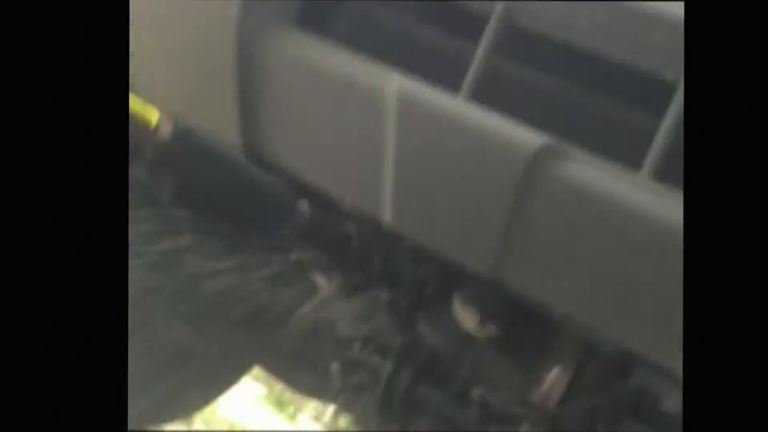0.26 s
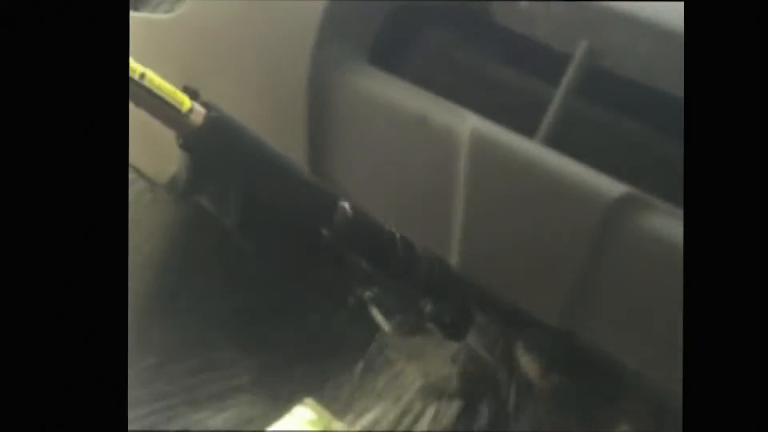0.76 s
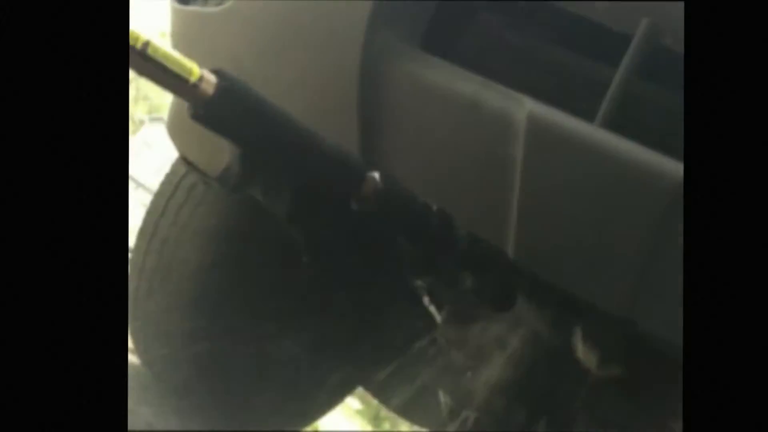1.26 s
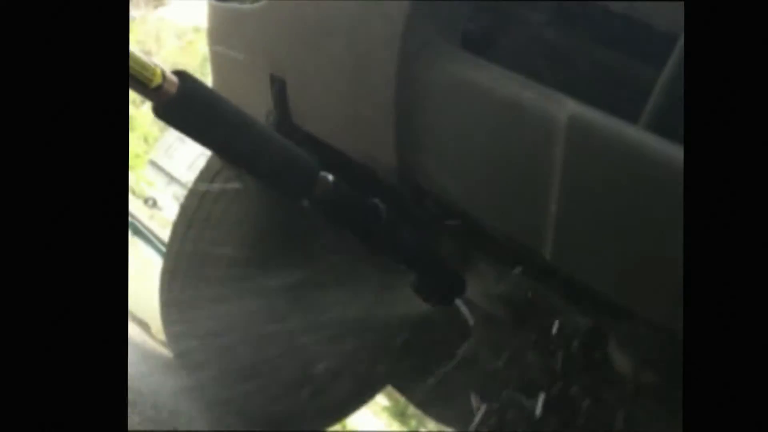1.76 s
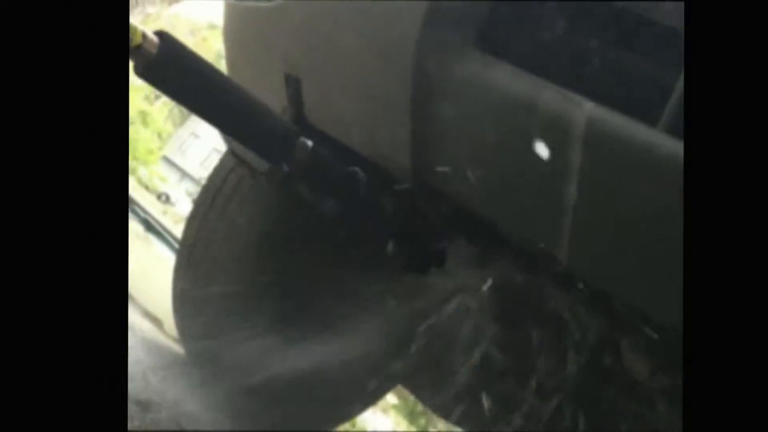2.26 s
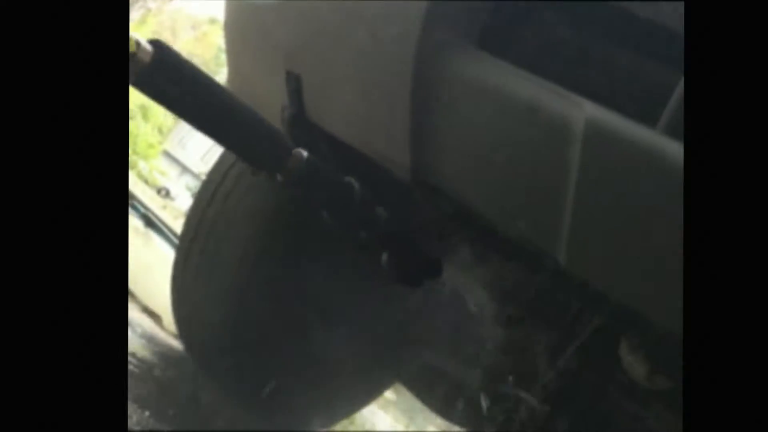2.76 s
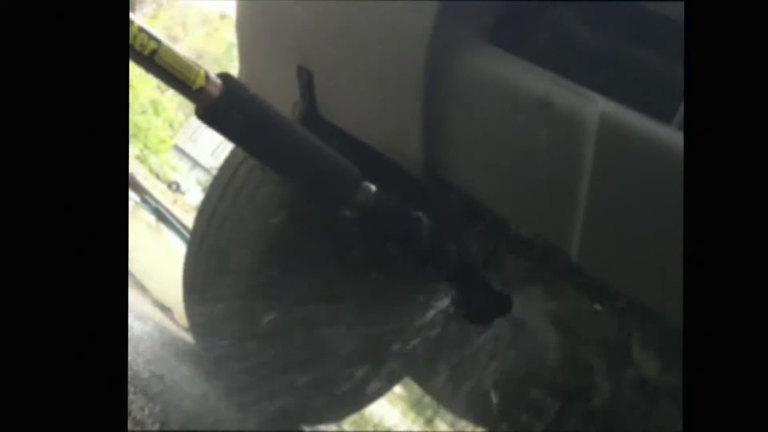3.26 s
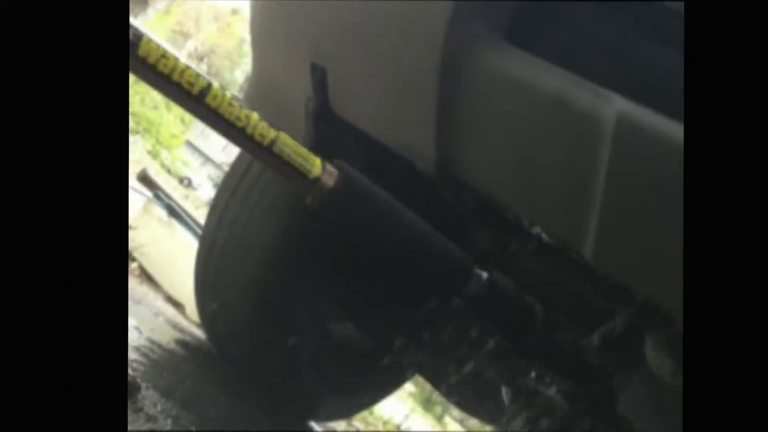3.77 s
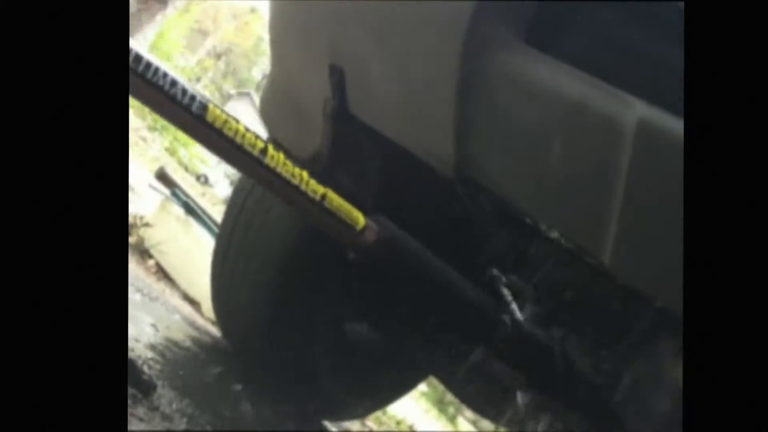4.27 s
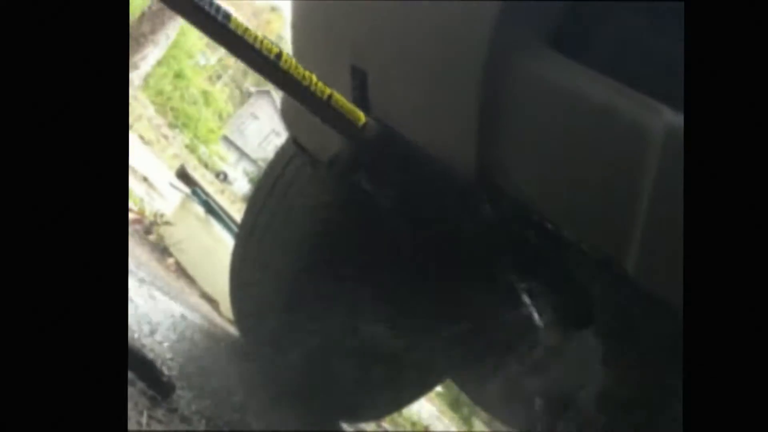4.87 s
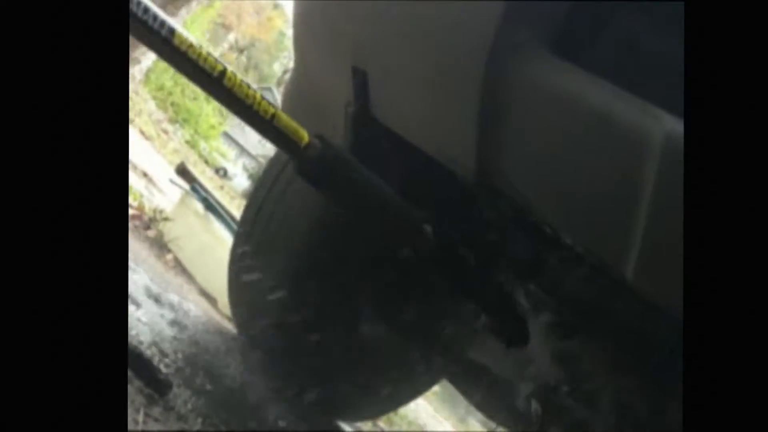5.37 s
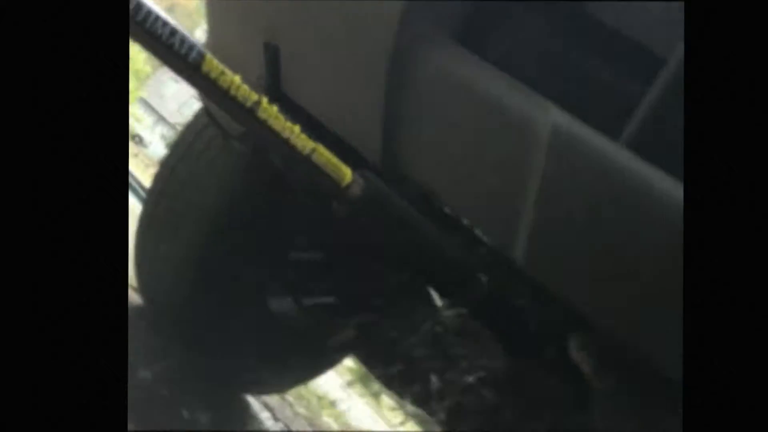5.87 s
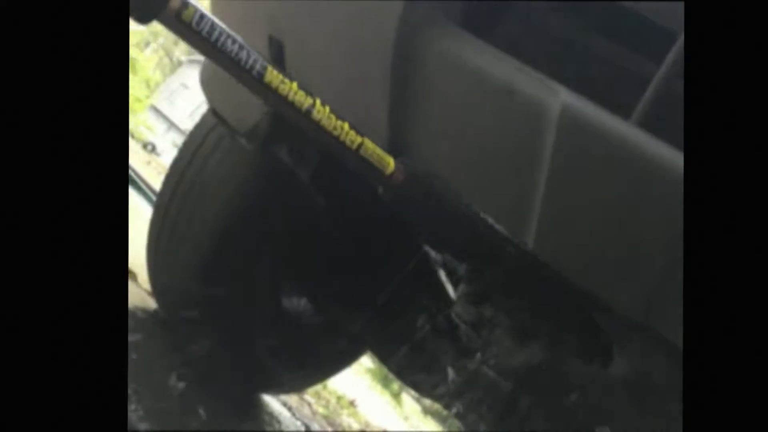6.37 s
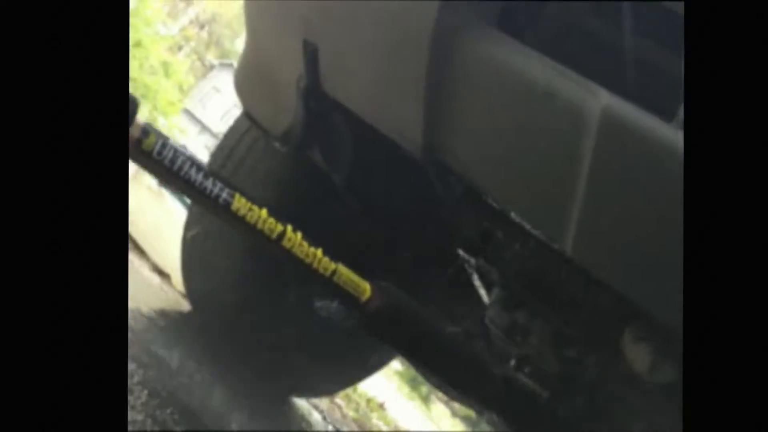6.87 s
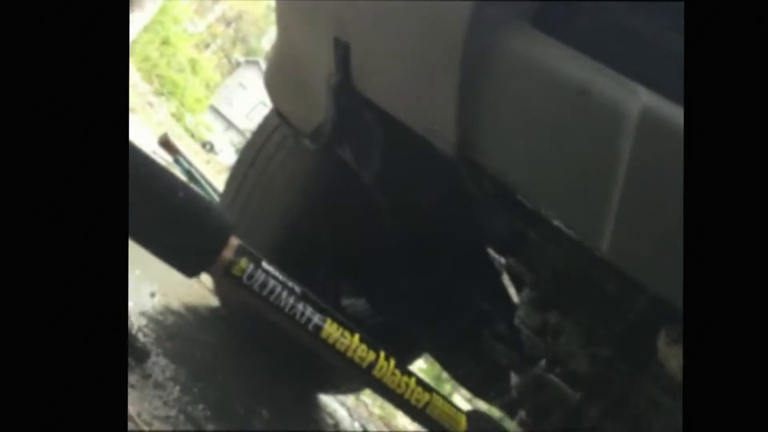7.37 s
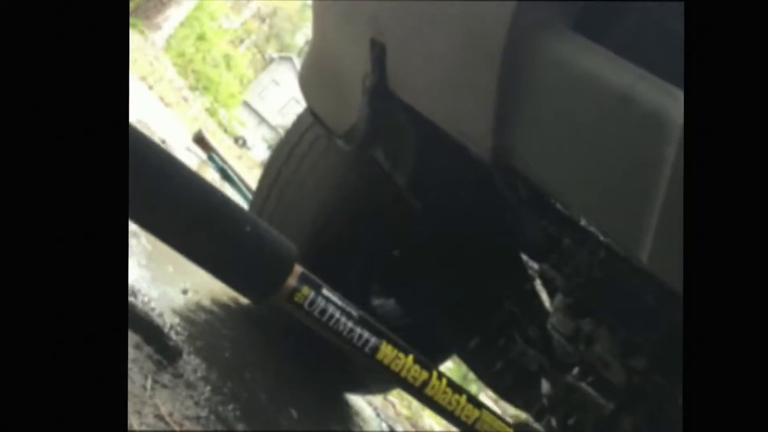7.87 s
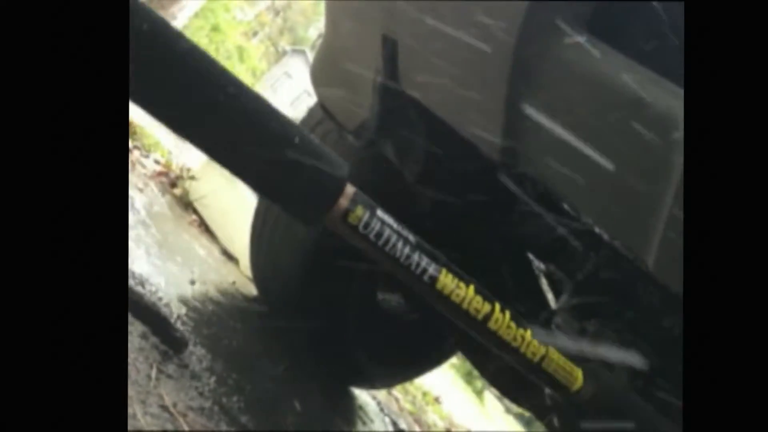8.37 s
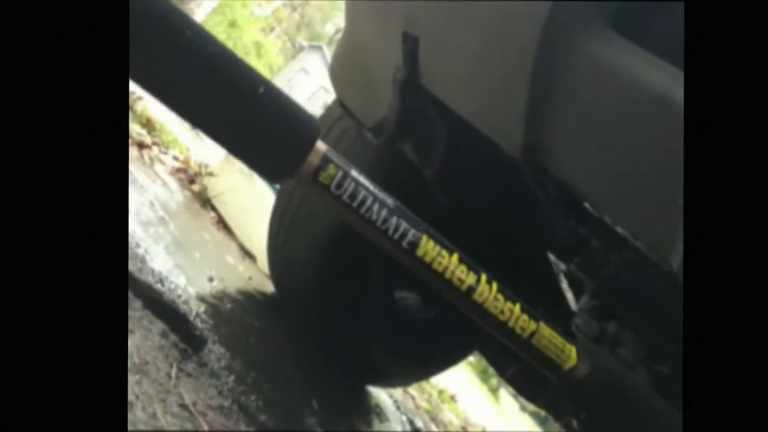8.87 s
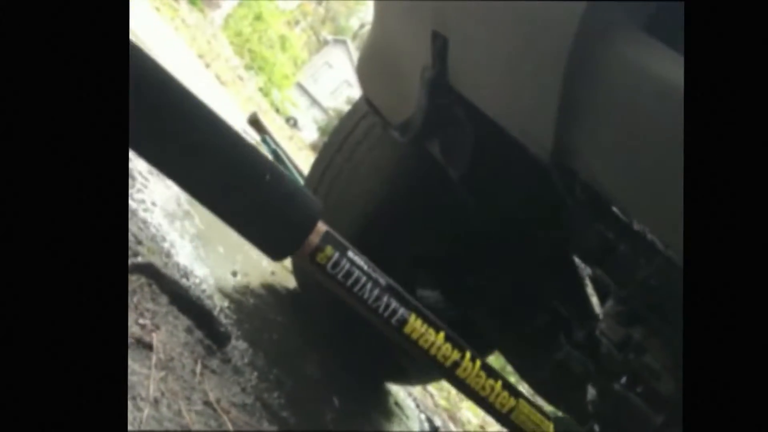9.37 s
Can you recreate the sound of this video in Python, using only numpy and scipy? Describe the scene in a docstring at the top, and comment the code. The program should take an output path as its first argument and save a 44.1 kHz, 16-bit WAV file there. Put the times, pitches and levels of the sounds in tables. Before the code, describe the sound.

A strong water jet sweeps across hard parts beneath a vehicle, heard from very near. It begins as nearly continuous rushing spray with brief dips, swells into harsh splashing, then comes in short uneven hits. Heavy slugs slap and ring dully, close echoes shift the colour, and light drips and ground wash fill the gaps above a soft outdoor rumble.

```python
"""Outdoors, close by: a hose wand sprays the underside of a car.
The jet breaks into slugs and drops: bursts of noise that drum on one part after another, each with
its own hollow ring. Echo paths between floor, tyre and ground open and close as the wand moves.
Heavy slugs slap hollow parts, panels thrum, stray spray patters all round over a low outdoor rumble."""
import sys
import numpy as np
from scipy import signal
from scipy.fft import rfft, irfft, next_fast_len
from scipy.io import wavfile
from scipy.ndimage import uniform_filter1d

SR = 44100
rng = np.random.default_rng(int(sys.argv[2]) if len(sys.argv) > 2 else 0)


def wrap_up_sound(samples):
    """Save the sound to the file named by the first command line argument, as 16-bit audio."""
    columns = np.atleast_2d(samples).T
    # keep every value between -1 and 1, then stretch to whole-number steps
    tamed = np.clip(columns, -1, 1)
    steps = np.round(tamed * 32767).astype(np.int16)
    wavfile.write(sys.argv[1], SR, steps)


N = 424241
TIME = np.arange(N) / SR  # seconds
PADDED = next_fast_len(N + SR // 10)
BINS_HZ = np.maximum(np.fft.rfftfreq(PADDED, 1 / SR), 1)


def from_db(db):
    """Decibels to gain."""
    return 10 ** (np.asarray(db) / 20)


def rms_one(x):
    """Scale to unit power."""
    return x / np.sqrt(np.mean(x ** 2) + 1e-20)


def over_time(table):
    """Join the points of a table (seconds, value) with straight lines."""
    return np.interp(TIME, *np.transpose(table))


def drift(rate):
    """Smooth random wandering of spread 1 that changes about `rate` times a second."""
    # computed at every 40th sample, then joined by straight lines
    r = np.exp(-80 * np.pi * rate / SR)
    noise = rng.standard_normal(N // 40 + 3002)
    slow = signal.lfilter([1], [1, -2 * r, r * r], noise)[3000:]  # skip the filter's start
    return np.interp(np.arange(N) / 40, np.arange(len(slow)), rms_one(slow))


def resonator(hz, width_hz):
    """Filter coefficients of one resonance with gain 1 on top."""
    r = np.exp(-np.pi * width_hz / SR)
    zeros = np.array([1, 0, -1]) * (1 - r * r) / 2
    poles = [1, -2 * r * np.cos(2 * np.pi * hz / SR), r * r]
    return zeros, poles


def resonate(x, hz, width_hz):
    """Ring one resonance with a sound."""
    return signal.lfilter(*resonator(hz, width_hz), x)


def slow_level(x, window_s):
    """Running rms: dividing by it evens out the slow level and keeps the fast grain."""
    size = int(window_s * SR / 2) + 1
    power = uniform_filter1d(uniform_filter1d(x * x, size), size)
    return np.sqrt(np.abs(power) + 1e-20)


def coloured(x, spectrum):
    """Give a sound the spectrum (Hz, dB), falling away below its lowest point, at unit power."""
    hz, db = np.transpose(spectrum)
    gain = from_db(np.interp(np.log(BINS_HZ), np.log(hz), db))
    gain = gain * np.minimum(BINS_HZ / hz[0], 1) ** 2
    return rms_one(irfft(rfft(x, PADDED) * gain, PADDED)[:N])


def drops(per_s, spread_db, splat_s):
    """Power of impacts at random moments, mean 1: many small, a few large, each dying away at once."""
    sizes = from_db(spread_db * np.minimum(rng.exponential(1, N), 4))
    hits = rng.random(N) < per_s / SR
    power = signal.lfilter([1], [1, -np.exp(-1 / (splat_s * SR))], sizes ** 2 * hits + 1e-12)
    return power / power.mean()


# How far the jet has broken up, from an even fan of mist to slugs and drops.
# Each row: time in seconds, share from 0 to 1.
BREAKUP = [(0, 0.34), (0.9, 0.47), (1.6, 0.56), (2.3, 0.63), (3.2, 0.66)]


def jet():
    """Power of the jet on the metal: fine drops in a smooth mist, and heavy slugs once it breaks up."""
    broken = over_time(BREAKUP)
    fine = 1 + from_db(5.0) * drops(per_s=1900, spread_db=7.0, splat_s=0.00077)
    slugs = drops(per_s=260, spread_db=3.0, splat_s=0.0041)
    return 1 + broken * (fine / fine.mean() - 1), 1 + broken * (slugs - 1), broken


def contact(t, start, end, speed):
    """Gain of one pass: it swells as the jet lands, holds, and fades as it slides off; fast is crisp."""
    land_db_per_s, leave_db_per_s = 338, 294  # at speed 1
    early_s, late_s = np.maximum(start - t, 0), np.maximum(t - end, 0)
    return from_db(-speed * (land_db_per_s * early_s + leave_db_per_s * late_s))


# Resonances of the parts under the jet; each is filtered twice, which narrows its ring.
# Each row: pitch in Hz, width of one filter in Hz, level in dB relative to the other rows.
SILL = [(770, 420, -4), (1054, 200, 1), (1403, 310, 2.5), (2240, 760, 1.5), (3030, 2100, -3),
        (4100, 3600, -1.5), (9100, 2600, -4.5), (12500, 22000, -5)]
SILL_LIP = [(796, 380, -4), (1106, 370, 0.5), (2200, 540, 1.5), (2520, 2700, 5), (4000, 810, 0),
            (6300, 2000, -2.5), (10500, 20000, -6)]
WHEEL_ARCH = [(775, 250, -7.5), (1480, 200, -1), (2230, 1860, 7), (3760, 1000, 1.5), (5870, 1660, 7),
              (9130, 1200, 5.5), (11840, 730, 3.5), (14400, 2000, -7)]
FLOOR_PAN = [(770, 440, -19), (1830, 910, 10), (2830, 320, 2.5), (3360, 300, 6), (5240, 940, -2.5),
             (8500, 3100, -9), (11400, 1200, -10.5)]
CHASSIS = [(790, 370, -10), (1350, 680, 0), (1940, 1100, 6.5), (2870, 640, 4.5), (3900, 1700, 0),
           (5540, 1800, 1.5), (8400, 2000, -6.5), (11900, 6000, -12.5)]
FRAME_RAIL = [(1080, 130, -0.5), (1570, 410, 1.5), (2250, 290, 6), (2930, 450, -3), (3680, 580, -4.5),
              (4850, 990, -3.5), (8000, 1400, -11)]
BRACKET = [(1970, 230, -6), (2680, 560, 6), (4500, 280, 1), (5640, 750, 10), (9000, 950, -4.5),
           (11750, 920, -15)]
PIPE = [(1190, 180, -2.5), (2170, 480, 2.5), (2810, 350, 5), (4170, 960, 2), (6100, 600, -9),
        (8420, 610, -4)]
SHIELD = [(715, 620, -7.5), (1270, 330, 0.5), (1596, 370, 10.5), (3080, 2600, 0.5), (6450, 6200, -6),
          (8760, 700, 8), (11400, 5800, -2)]
SPRING = [(2240, 230, 5.5), (2880, 870, 0.5), (3750, 390, 10), (4530, 820, 8.5), (4920, 360, 11),
          (5740, 700, 0.5), (8700, 5000, -10.5)]
CROSS_MEMBER = [(690, 400, -8.5), (1200, 300, -0.5), (1480, 380, 7.5), (1690, 110, 2), (2720, 500, 6),
                (3363, 210, 10), (4350, 490, -6), (6900, 5900, -9.5)]
AXLE = [(1690, 830, 8.5), (2690, 500, 17.5), (3560, 240, 7), (3930, 1800, 7), (5130, 2500, -4.5),
        (5900, 450, 3), (7700, 7100, -12.5)]
MUD_FLAP = [(710, 180, -6.5), (1490, 790, -2), (2310, 980, -1.5), (2865, 240, 4.5), (3580, 1300, -5.5),
            (5420, 300, -8), (9400, 2700, -6.5), (13100, 9400, -12)]
HUB_CAP = [(795, 490, -13.5), (1390, 78, -6), (2120, 660, 5), (2930, 960, 4.5), (4430, 120, -2),
           (5780, 900, 5), (9000, 1500, -9.5), (12000, 1100, -12)]
# Edges that the jet grazes, and the tyre.
# Each row: pitch in Hz, width of one filter in Hz, relative level in dB.
RAIL_END = [(1060, 150, -7), (2180, 210, 8), (3000, 700, -14), (3700, 1000, 2.5), (4640, 600, -0.5),
            (5860, 630, -10), (8500, 4900, -19)]
BOLT = [(3330, 500, 6), (6250, 900, 3), (9100, 1100, -11)]
SHIELD_RIM = [(1380, 550, -2.5), (2650, 2300, 1.5), (7000, 4600, 2.5), (10200, 2000, 1), (13700, 3000, -4)]
CLAMP = [(1300, 440, 3), (2840, 570, -16.5), (5700, 9100, -34)]
SEAM = [(2870, 550, 20), (4500, 1800, 4), (9540, 5400, -27)]
TYRE = [(1430, 200, -4.5), (2020, 1040, -3.5), (4400, 720, 7.5), (7500, 17000, -12)]
# The wet ground under the car.
# Each row: pitch in Hz, width of one filter in Hz, relative level in dB.
GROUND = [(690, 340, -6.5), (1120, 96, 0.5), (1366, 84, 2), (2220, 3860, 0.5), (4350, 260, -1),
          (5070, 6600, -2.5), (10400, 15000, -5.5)]
# The jet lands on a part, stays and slides off.
# Each row: start in seconds, end in seconds, level in dB before the spray's own level and flares,
# brightness in dB per octave, sweep speed (1 = usual), part.
PASSES = [(0.0, 0.26, -26.5, 1, 0.17, SILL), (0.425, 0.893, -26.5, 1.2, 0.22, SILL),
          (0.947, 1.17, -24, 0.24, 0.24, SILL), (1.28, 1.495, -22.5, 2.5, 0.49, SILL_LIP),
          (1.55, 1.61, -25, 13.5, 0.93, CLAMP), (1.605, 1.725, -33, -6.5, 1.3, SILL_LIP),
          (1.788, 1.845, -21.5, 0.4, 0.73, SILL_LIP), (1.921, 2.099, -21, 1, 0.77, SILL_LIP),
          (2.167, 2.773, -27, -4.5, 0.78, WHEEL_ARCH), (2.785, 2.89, -26.5, -3, 1.9, FLOOR_PAN),
          (2.925, 3.2, -21.6, -2.5, 0.7, WHEEL_ARCH), (3.207, 3.704, -22, 0, 0.74, HUB_CAP),
          (3.74, 3.88, -25, -3.5, 0.78, HUB_CAP), (3.888, 3.98, -23, -2.5, 0.6, FLOOR_PAN),
          (4.258, 4.33, -32, 6, 3.2, MUD_FLAP), (4.3, 4.43, -22, -1, 0.9, CHASSIS),
          (4.485, 4.662, -24.5, -1, 1.1, CHASSIS), (4.745, 4.98, -21.7, -0.7, 0.53, CHASSIS),
          (5.075, 5.127, -31, -6, 0.5, SEAM), (5.505, 5.64, -32, -4, 0.95, TYRE),
          (5.865, 5.956, -22.5, -0.5, 0.9, FRAME_RAIL), (5.99, 5.996, -27, -6, 2.3, FRAME_RAIL),
          (5.988, 6.115, -24.7, -0.5, 1.3, RAIL_END), (6.307, 6.358, -35, 1, 2.1, CLAMP),
          (6.36, 6.526, -30, -2, 2.1, SEAM), (6.408, 6.452, -21.5, 4, 1.25, BRACKET),
          (6.512, 6.54, -36, 5, 0.9, CLAMP), (6.836, 6.892, -32.5, -0.5, 0.88, SHIELD_RIM),
          (7.076, 7.21, -32, 2.5, 0.85, SHIELD_RIM), (7.156, 7.155, -30.5, -12, 1.7, CLAMP),
          (7.207, 7.267, -25.5, 3.5, 1.7, PIPE), (7.24, 7.248, -21.7, 1, 0.9, PIPE),
          (7.27, 7.435, -34.5, 2, 0.62, SHIELD), (7.35, 7.425, -35.5, -3, 1.3, BOLT),
          (7.452, 7.792, -31.5, -0.8, 0.9, SHIELD), (7.463, 7.49, -33, 14, 1.8, BRACKET),
          (7.605, 7.778, -34.5, 3.5, 1, CLAMP), (7.8, 7.843, -34.5, 4, 0.75, SPRING),
          (7.86, 7.912, -26.5, -19, 1.4, SPRING), (7.91, 7.97, -25, 6.5, 1.5, SPRING),
          (7.977, 8.004, -29.5, 8, 0.46, SPRING), (8.126, 8.18, -24.7, -1, 2.2, CROSS_MEMBER),
          (8.14, 8.183, -29.5, -7, 1.3, FRAME_RAIL), (8.227, 8.262, -24.3, -2, 1.2, CROSS_MEMBER),
          (8.43, 8.45, -27, 15, 0.9, AXLE), (8.462, 8.492, -24, 3, 0.9, AXLE),
          (8.552, 8.58, -33, -2, 0.52, CROSS_MEMBER), (8.915, 9.05, -34.5, 10, 2.2, MUD_FLAP),
          (8.98, 9.045, -43, -5, 1.1, SILL), (9.13, 9.254, -35, 16, 0.41, MUD_FLAP),
          (9.278, 9.404, -24.5, 3.3, 0.69, MUD_FLAP), (9.437, 9.515, -25, -1, 0.41, MUD_FLAP),
          (9.56, 9.627, -32, 0, 0.77, MUD_FLAP)]
# Water that misses the car and washes the ground; the thrum and patter follow it too.
# Each row: time in seconds, level in dB before the spray's own level and flares.
WASH = [(0, -34), (4.0, -34.5), (4.15, -49.5), (4.235, -40), (4.28, -30.5), (5.3, -38), (6.3, -36.5),
        (6.6, -42), (6.73, -45.5), (7.0, -45), (7.12, -42), (8.28, -38.5), (8.36, -42), (8.44, -35),
        (8.68, -34.5), (8.79, -53), (8.88, -53), (9.0, -43.5), (9.62, -46)]
TILT_PIVOT_HZ = 2840  # brightness and treble lag count octaves from here
# per octave: the fringe of the jet only drums, so the treble comes later and goes sooner
TREBLE_LAG_S = 0.0015


def underbody(fine, slugs, broken, slug_corner_hz, slap_db, flicker_db, flickers_per_s,
              clump_db, clumps_per_s):
    """The jet slides over parts and wet ground; slugs drive the low rings, fine drops the high ones."""
    out = np.zeros(N)
    # each resonance swells and sinks as the jet wanders, and flutters as clumps of drops reach it
    flickers = []
    for _ in SILL:
        wander_db = flicker_db * drift(flickers_per_s)
        flutter_db = clump_db * broken * drift(clumps_per_s)
        flickers.append(from_db(wander_db + flutter_db))
    # the bare slap of water on water has no pitch
    bare = from_db(slap_db) * np.sqrt(fine) * rng.standard_normal(N)
    # passes that follow one another get unrelated turbulence
    turbulence = rng.standard_normal(size=(3, len(SILL), N))

    def rings(part, tilt, on, noises, slug_share=1):
        """One band of sound for each resonance of a part."""
        for noise, flicker, (hz, width, db) in zip(noises, flickers, part):
            heavy = slug_share * slug_corner_hz / (slug_corner_hz + hz)
            power = heavy * slugs[on] + (1 - heavy) * fine[on]
            blows = noise[on] * flicker[on] * np.sqrt(power)
            ring = resonate(resonate(blows, hz, width), hz, width)
            yield from_db(db + tilt * np.log2(hz / TILT_PIVOT_HZ)) * ring

    for k, (start, end, db, tilt, speed, part) in enumerate(PASSES):
        on = np.flatnonzero((TIME > start - 0.2) & (TIME < end + 0.3))
        voices = [bare[on], *rings(part, tilt, on, turbulence[k % 2])]
        lags = [0] + [TREBLE_LAG_S * np.log2(hz / TILT_PIVOT_HZ) for hz, *_ in part]
        struck = sum(voice * contact(TIME[on], start + lag, end - lag, speed)
                     for voice, lag in zip(voices, lags))
        out[on] += from_db(db) * struck / slow_level(sum(voices), window_s=0.096)
    # most slugs have broken up by the time they reach the ground
    ground = bare + sum(rings(GROUND, 0, slice(None), turbulence[-1], slug_share=0.6))
    return out + from_db(over_time(WASH)) * ground / slow_level(ground, window_s=0.31)


# The jet backs away from flat metal, twice.
# Each row: time in seconds, spacing of the echo's comb in Hz, echo share from 0 to 1.
GAP = [(1.0, 3330, 0.03), (1.4, 3330, 0.1), (1.9, 3430, 0), (2.25, 3020, 0.13), (2.6, 3070, 0.4),
       (2.85, 3050, 0.06), (3.3, 3030, 0), (3.9, 3000, 0.14), (4.85, 2830, 0.24), (5.2, 2850, 0.25),
       (6.601, 3600, 0.03), (6.85, 3660, 0.34), (7.08, 3400, 0), (7.33, 3100, 0.66), (7.48, 2920, 0.12),
       (7.62, 2970, 0.17), (7.9, 2800, 0)]


def nozzle_echo(x):
    """One close echo between nozzle and metal: a wider gap delays it and narrows its comb spacing."""
    s, *columns = np.transpose(GAP)
    spacing_hz, share = (np.interp(TIME, s, column) for column in columns)
    echo = np.interp(TIME - 1 / spacing_hz, TIME, x)
    return (x + share * echo) / np.sqrt(1 + share ** 2)


def shifting_echoes(x, focus, nearest_s, farthest_s, echo_db, changes_per_s, sway_s, count=10):
    """Short echoes from floor, tyre and ground comb the sound as their paths stretch, open and close."""
    out, power = x.copy(), 1
    for lag in np.geomspace(nearest_s, farthest_s, count):
        delay = lag + sway_s * drift(rate=0.7)
        # a wide fan of mist has little focus and blurs the echoes
        gain = focus * from_db(echo_db) * drift(changes_per_s)
        out += gain * np.interp(TIME - delay, TIME, x)
        power = power + gain ** 2
    return out / np.sqrt(power)  # keeps the power about the same


# Lower edges of drumming, splash, fizz and hiss; the struck sound below the first is left out.
# Each entry: an edge in Hz.
CROSSOVERS_HZ = [560, 1900, 4600, 7600]


def registers(x):
    """Split a sound into four bands that join without a seam, the last open at the top."""
    above = [1 / (1 + (hz / BINS_HZ) ** 12) for hz in CROSSOVERS_HZ] + [0]
    spectrum = rfft(x, PADDED)
    return [irfft(spectrum * (low - high), PADDED)[:N] for low, high in zip(above, above[1:])]


# The jet meets the metal squarely and bursts into a brighter spray.
# Each row: middle in seconds, length in seconds, boost in dB before the shares below.
FLARES = [(0.193, 0.53, 4), (0.653, 0.27, 3.5), (1.092, 0.14, 4), (1.454, 0.15, 3), (1.798, 0.13, 4.7),
          (1.98, 0.079, 3.5), (2.199, 0.091, 6), (2.38, 0.16, 10.5), (2.54, 0.2, 5), (2.725, 0.14, 9),
          (3, 0.26, 3), (4.67, 0.2, 8.5), (5.87, 0.15, 4.5)]
# How much of that boost reaches each register, from low to high.
# Each entry: a share of the dB, for drumming, splash, fizz, hiss.
FLARE_SHARES = [0.35, 0.55, 0.9, 1.05]


def spray(level_db):
    """The struck parts, heard through close echoes; each flare lifts the treble most."""
    fine, slugs, broken = jet()
    struck = underbody(fine, slugs, broken, slug_corner_hz=3150, slap_db=-27.5,
                       flicker_db=2.05, flickers_per_s=9.4, clump_db=1.5, clumps_per_s=39)
    tinted = moving_colour(nozzle_echo(struck))
    heard = shifting_echoes(tinted, broken, nearest_s=0.000699, farthest_s=0.007,
                            echo_db=-10.0, changes_per_s=3.73, sway_s=0.000157)
    flare_db = sum(db * np.cos(np.pi * np.clip((TIME - middle) / length, -0.5, 0.5))
                   for middle, length, db in FLARES)
    return sum(from_db(level_db + share * flare_db) * register
               for share, register in zip(FLARE_SHARES, registers(heard)))


def panel_thrum(level_db, follow, wash_follow):
    """Heavy panels answer dully at two low pitches, rising with the wash and louder under the jet."""
    on_metal = np.max([contact(TIME, start, end, speed)
                       for start, end, _, _, speed, _ in PASSES], axis=0)
    wash_db = over_time(WASH)
    blows = np.sqrt(drops(per_s=300, spread_db=3.0, splat_s=0.0031)) * rng.standard_normal(N)
    rings = resonate(blows, hz=273.0, width_hz=42) - from_db(-2) * resonate(blows, hz=405, width_hz=120)
    gain = from_db(level_db + wash_follow * (wash_db - wash_db.mean()))
    return gain * (1 + follow * on_metal) * rms_one(rings)


# Colour of the far patter on the wet ground.
# Each row: pitch in Hz, relative strength in dB per Hz.
PATTER = [(350, -17), (600, -9), (677, -10), (765, -5.5), (900, -11.5), (2600, -9), (5700, -7),
          (10600, -11), (15000, -26)]


def stray_spray(level_db, follow):
    """Water thrown back off the car patters lightly on the ground, rising and falling with the wash."""
    wash_db = over_time(WASH)
    patter = np.sqrt(drops(per_s=720, spread_db=2.0, splat_s=0.0054)) * rng.standard_normal(N)
    return from_db(level_db + follow * (wash_db - wash_db.mean())) * coloured(patter, PATTER)


# Colour of the low outdoor rumble.
# Each row: pitch in Hz, relative strength in dB per Hz.
YARD = [(15, -58), (25, -32), (113, -2), (270, 2), (485, -5), (560, -1), (730, -33), (1230, -120)]
# Its level over time; the swell near 9 s is the hose being handled. # Each row: time in seconds, level in dB
# before the trim.
RUMBLE = [(0, -64.5), (3.5, -62.5), (6.7, -65.5), (8.85, -66), (9.0, -60.5), (9.62, -62.5)]


def yard(trim_db):
    """Low rumble of the outdoors, made of coloured noise; near 9 s the hose being handled adds to it."""
    return from_db(over_time(RUMBLE) + trim_db) * coloured(rng.standard_normal(N), YARD)


# Heavy slugs that slap a hollow part.
# Each row: start in seconds, peak in dB before the common level, ring pitch in Hz,
# width of one of two ring filters in Hz, dying time of the splat in seconds.
SLAPS = [(1.061, -12, 2110, 600, 0.003), (1.804, -9, 3900, 900, 0.008), (3.824, -15.5, 2885, 900, 0.005),
         (4.252, -17, 8480, 2500, 0.016), (6.37, -16, 2930, 700, 0.006), (7.727, -21, 7400, 900, 0.01),
         (8.233, -15, 1590, 700, 0.008), (9.343, -17, 1720, 900, 0.005), (2.288, -9, 2230, 1500, 0.0039),
         (4.907, -8.5, 2630, 1200, 0.0047), (5.816, -18, 1060, 130, 0.026),
         (5.943, -9.5, 2720, 1400, 0.0098), (6.107, -14.5, 3240, 260, 0.01), (6.341, -19, 1660, 400, 0.013),
         (6.524, -18, 1250, 280, 0.0074), (6.898, -20, 6760, 700, 0.0037), (7.016, -24.5, 2820, 450, 0.013),
         (7.259, -12.5, 3230, 2000, 0.0038), (7.624, -19, 1520, 500, .004),
         (8.287, -21.5, 1485, 500, 0.0031), (8.897, -25, 9400, 6000, 0.013)]


def slaps(level_db):
    """A heavy slug bursts on the metal as dying noise and rings it briefly."""
    out = np.zeros(N)
    age = np.arange(SR // 5) / SR
    for start, db, hz, width_hz, dying_s in SLAPS:
        splat = rng.standard_normal(len(age)) * np.exp(-age / dying_s)
        burst = resonate(resonate(splat, hz, width_hz), hz, width_hz)
        out[int(start * SR):][:len(age)] += from_db(db + level_db) * burst / np.abs(burst).max()
    return out


def gliding_bands(x, table, width_hz, fade_s, size=256):
    """Lift or hollow one band of a sound for a while; its pitch glides evenly from start to end."""
    out = x.copy()
    for start, end, from_hz, to_hz, db in table:
        state = np.zeros(2)
        first = max(int((start - fade_s) * SR), 0)
        last = min(int((end + fade_s) * SR), N)
        # short blocks, each with its own pitch
        for i in range(first, last, size):
            t = TIME[i:i + size]
            hz = np.exp(np.interp(t[0], [start, end], np.log([from_hz, to_hz])))
            band, state = signal.lfilter(*resonator(hz, width_hz), out[i:i + size], zi=state)
            present = np.clip(0.5 + np.minimum(t - start, end - t) / fade_s, 0, 1)
            out[i:i + size] += (from_db(db * present) - 1) * band
    return out


# The jet runs along a part and its ring glides.
# Each row: start in seconds, end in seconds, first pitch in Hz, last pitch in Hz, boost in dB.
SWEEPS = [(1.62, 1.76, 1300, 1400, 3), (7.06, 7.17, 6700, 6500, 4.5), (8.39, 8.45, 8000, 8500, 9),
          (8.41, 8.57, 5200, 1900, 6)]
# An echo from a surface beside the nozzle cancels one band.
# Each row: start in seconds, end in seconds, first pitch in Hz, last pitch in Hz, change in dB.
HOLLOWS = [(1.58, 1.76, 10300, 10000, -12), (1.88, 4.22, 7750, 7950, -5.5), (2.15, 2.44, 760, 1000, -7),
           (2.46, 2.76, 1350, 1450, -5), (2.45, 4.2, 4700, 5000, -4.5), (7.05, 7.27, 6000, 5400, -10)]


def moving_colour(x):
    """The wet patch rings at a gliding pitch as the jet sweeps; close echoes cancel other bands."""
    swept = gliding_bands(x, SWEEPS, width_hz=420, fade_s=0.03)
    return gliding_bands(swept, HOLLOWS, width_hz=560, fade_s=0.06)


def scene():
    """Spray, slaps, thrum and patter over the background."""
    on_car = spray(level_db=0.87) + slaps(level_db=-1.0)
    on_car = on_car + panel_thrum(level_db=-64.5, follow=1.0, wash_follow=0.25)
    around = stray_spray(level_db=-44.5, follow=0.22) + yard(trim_db=4.6)
    return (on_car + around)[None]


def record(dry):
    """The microphone has a narrow hollow in the treble; the top is cut steeply."""
    cutoff_hz = 15800
    heard = dry - 0.54 * resonate(dry, hz=10400, width_hz=730)
    return signal.sosfilt(signal.ellip(12, 0.1, 80, cutoff_hz, fs=SR, output="sos"), heard)


dry = scene()
out = record(dry)
wrap_up_sound(out)
```